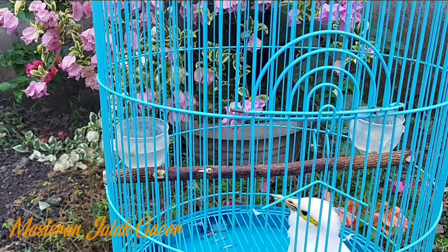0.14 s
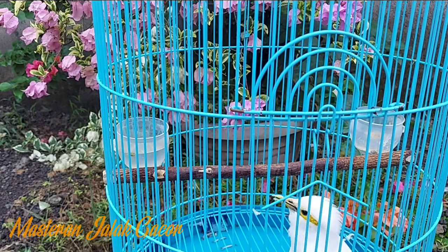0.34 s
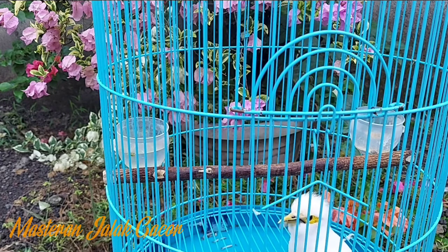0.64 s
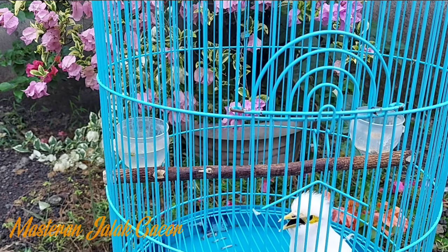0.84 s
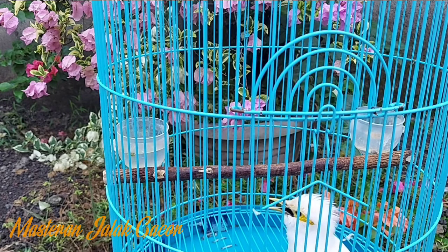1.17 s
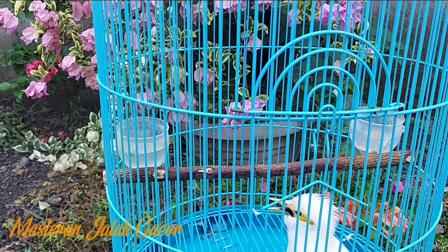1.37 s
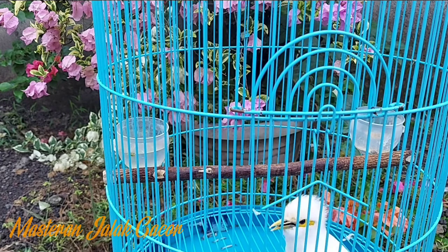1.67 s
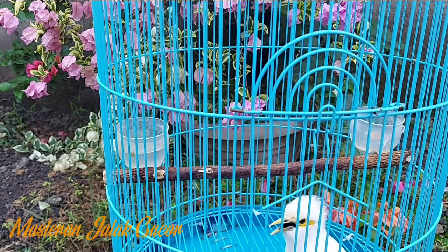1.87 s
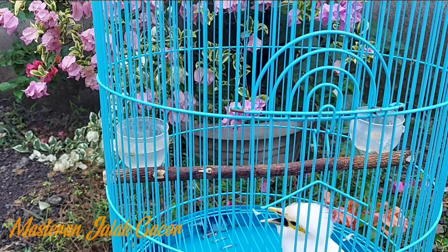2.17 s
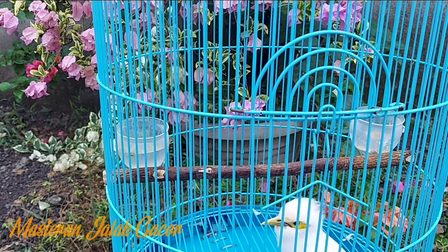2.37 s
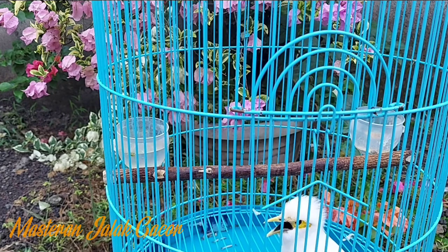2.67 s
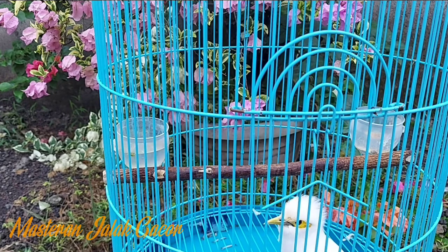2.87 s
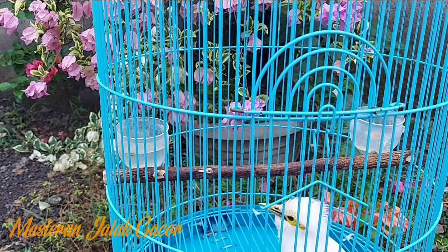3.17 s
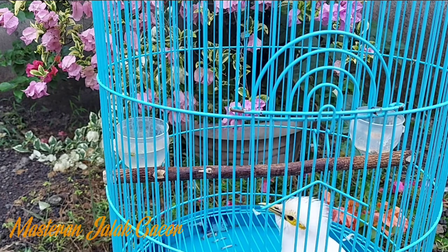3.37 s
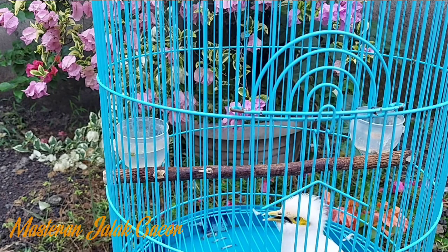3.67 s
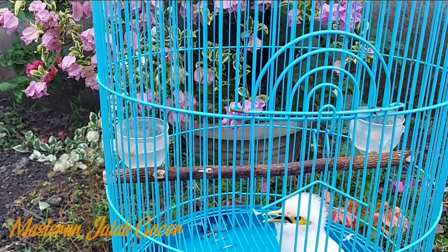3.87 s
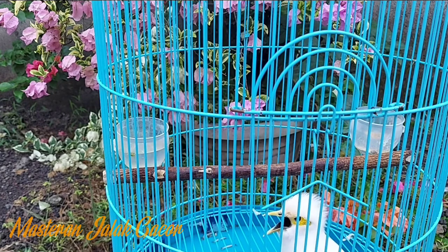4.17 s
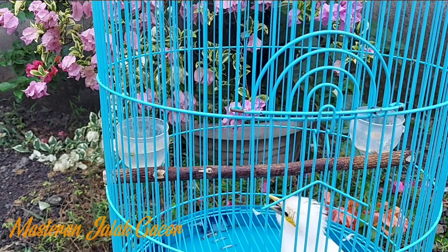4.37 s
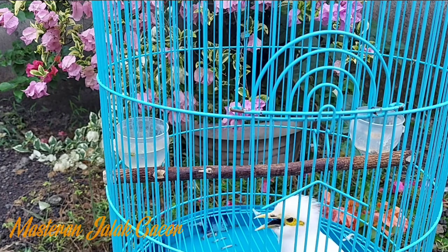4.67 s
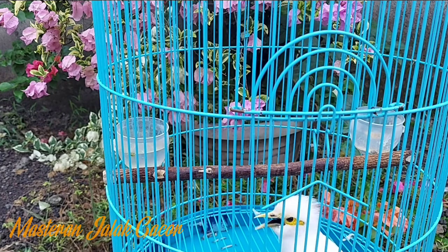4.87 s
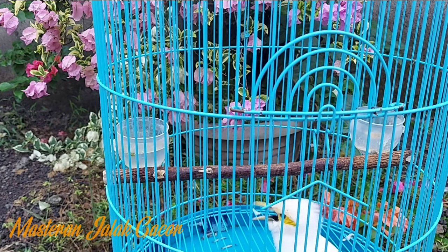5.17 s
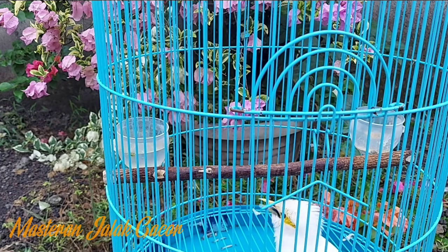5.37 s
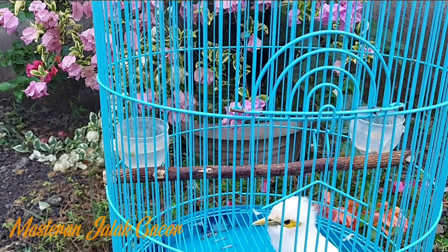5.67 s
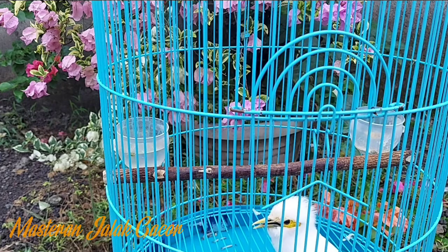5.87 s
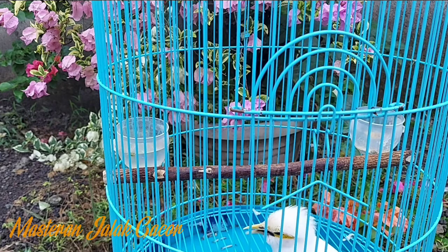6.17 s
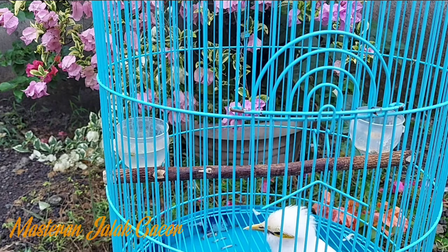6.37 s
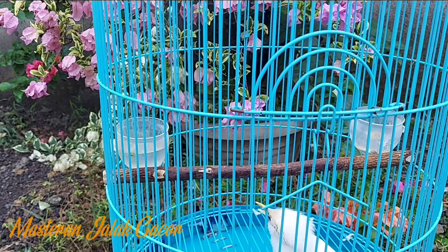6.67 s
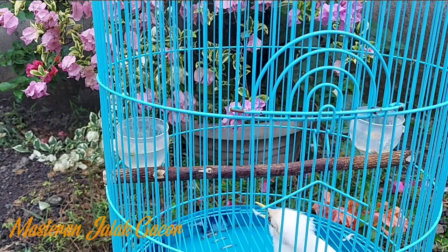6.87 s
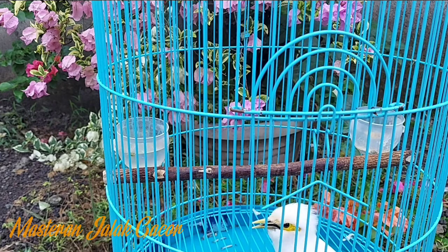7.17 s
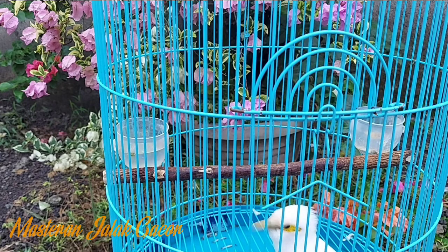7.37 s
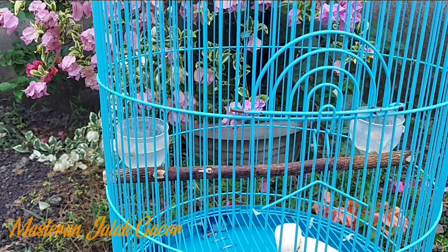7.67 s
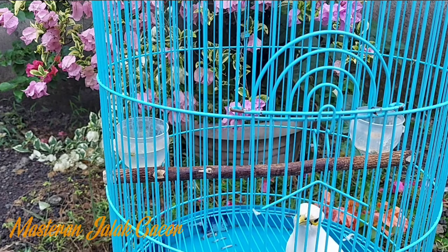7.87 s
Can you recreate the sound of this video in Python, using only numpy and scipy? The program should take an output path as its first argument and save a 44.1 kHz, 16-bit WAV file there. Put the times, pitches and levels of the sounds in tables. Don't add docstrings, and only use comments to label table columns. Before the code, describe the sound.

A white caged starling sings very near the microphone in a garden. Quick downward sweeps and upward scoops open, then a double note and two fluttering trills. Chattering phrases, short low coos, compact calls, a clicking rattle and three harsh rasps follow, with a longer rattle later. Another bird whistles softly further away. Traffic rumbles low, leaves and insects hiss faintly, and puffs of air bump the microphone.

```python
import sys
import numpy as np
from scipy import signal
from scipy.fft import rfft, irfft
from scipy.io import wavfile
from scipy.ndimage import uniform_filter1d, map_coordinates

SR = 44100
rng = np.random.default_rng(int(sys.argv[2]) if len(sys.argv) > 2 else 0)


def rack_gain(trim_db):
    fader = np.asarray(trim_db, float)
    return 10 ** (fader / 20)


def wrap_up_sound(samples):
    columns = np.atleast_2d(samples).T
    tamed = np.clip(columns, -1, 1)
    steps = np.round(tamed * 32767).astype(np.int16)
    wavfile.write(sys.argv[1], SR, steps)


N = 354123

# ms, pitch_hz, effort_db, overtones_db (over the fundamental)
RISE = [(1.9, 1100, -67, 5.5), (8.26, 1180, -45.5, 15.5), (13.1, 1610, -33, 14), (17.5, 2330, -19, -12),
        (24, 2640, -9.5, -16), (28, 2680, -17, -25), (33, 2650, -40, -18)]
# ms, pitch_hz, effort_db, overtones_db
STAB = [(0, 3300, -48.5, -21), (2.504, 3000, -22, -18), (5.02, 2620, -12, -11.5),
        (11.85, 2480, -11.5, -15.5), (18.4, 2400, -16.5, -23), (24, 2300, -25, -24), (29, 1600, -42, -30)]
# ms, pitch_hz, effort_db, overtones_db
HOLD = [(0, 2700, -38.5, -14.5), (4.1, 1900, -23, -2.5), (7.8, 2300, -6.5, -29), (12.3, 2445, -5.5, -14.5),
        (24, 2450, -8.5, -18), (32.7, 2420, -17.5, -10.5), (42, 2400, -19.5, -29), (48, 1900, -46, -25.5)]
# start_s, level_db, pitch_factor, length_factor
FIRST_TRILLS = [(1.607, -0.42, 1.005, 1.0)]
# start_s, level_db, pitch_factor, length_factor
TRILLS = [(1.823, 1.5, 1.002, 0.98), (4.425, -3.5, 0.99, 1.12), (4.764, -1.5, 0.99, 0.99),
          (4.972, -2, 1.005, 1.4), (7.146, -1.5, 0.988, 0.99)]
# start_s, level_db
RASPS = [(3.326, -1), (3.509, -1), (3.6944, -0.5)]


def at_hz(points, hz):
    table_hz, value = np.array(points)[:, 0], np.array(points)[:, 1]
    return np.interp(np.log(hz), np.log(table_hz), value)


def rms_one(x):
    return x / np.sqrt(np.mean(x ** 2) + 1e-20)


def levels(spans, column):
    t = np.arange(N) / SR
    gain = 0
    for rows in spans:
        points = np.array(rows)
        gain = gain + rack_gain(np.interp(t, points[:, 0], points[:, column], -200, -200))
    return gain


def wobble(size, top_hz):
    order = 4 if top_hz > 200 else 2
    lowpass = signal.butter(order, top_hz, fs=SR, output="sos")
    noise = rng.standard_normal(size + 400)
    return rms_one(signal.sosfilt(lowpass, noise)[400:])


def throat(x, modes):
    out = 0
    for k, (hz, width, db) in enumerate(modes):
        r = np.exp(-np.pi * width / SR)
        ring = [1, -2 * r * np.cos(2 * np.pi * hz / SR), r * r]
        out = out + (-1) ** k * rack_gain(db) * signal.lfilter([1 - r * r, 0, r * r - 1], ring, x)
    return out


def glide(x, mode, bend):
    hz, width, db = mode
    r = np.exp(-np.pi * width / SR)
    turn = np.exp(2j * np.pi * np.cumsum(hz * bend) / SR)
    ringing = signal.lfilter([1 - r], [1, -r], x / turn) * turn
    return 4 * rack_gain(db) * ringing.real


def gliding_throat(x, modes, bend):
    return sum((-1) ** k * glide(x, mode, bend) for k, mode in enumerate(modes))


def add(out, s, sound):
    at = round(s * SR)
    part = sound[max(-at, 0):N - at]
    out[max(at, 0):max(at, 0) + len(part)] += part


def placed(phrases, place):
    delay_s, level_db, higher, longer = place
    return [(s + delay_s * slow, db + level_db, pitch * higher, slow * longer)
            for s, db, pitch, slow in phrases]


def sing(shape, sung, rough, third_db, roll_db, breath_db, flutter_ms=10., flutter=0., trough_ms=0.,
         throb_db=0., punch=0., quicken=0., steady_ms=0., steep=0., strain=0., beak=None, count=8):
    # pitch_hz, level_db
    open_beak = [(2000, 4.5), (3500, -0.5), (5300, -9), (7000, 6.5), (8100, -2), (8900, -11.5), (9900, 1.5),
                 (15000, 2.5)]
    beak = beak or open_beak
    out = np.zeros(N)
    ms, hz, effort_db, press_db = np.transpose(shape)
    partial_db = effort_db, effort_db + press_db, effort_db + press_db + third_db
    for s, db, pitch, length in sung:
        at = np.where(ms > steady_ms, steady_ms + (ms - steady_ms) * length, ms)
        t = np.arange(at[0], at[-1], 1000 / SR)

        def smooth(column):
            return uniform_filter1d(np.interp(t, at, column), size=44)

        since = t - np.interp(trough_ms, ms, at)
        period_ms = flutter_ms + quicken * np.clip(53 - since, 0, None)
        beats = np.cumsum(1000 / SR / period_ms)
        beats -= np.interp(0, since, beats, 0, 0)
        begun = np.clip(2 * beats + 1, 0, 1)
        shake = begun * (1 - 2 * np.abs(np.cos(np.pi * beats)) ** 1.32)

        strained = rough * (1 + strain * begun)
        f = smooth(hz) * pitch * (1 + flutter * shake + 0.082 * strained * wobble(len(t), 450))
        phase = 2 * np.pi * np.cumsum(f) / SR
        db3 = [smooth(column) - throb_db * shake for column in partial_db]
        gains = [rack_gain(db3[0] + punch * db)]
        fade_db = roll_db + steep * (db3[0].max() - db3[0])
        for k in range(1, count):
            overtone_hz = (k + 1) * f
            level_db = db3[min(k, 2)] - fade_db * max(k - 2, 0) - punch * db / 2
            gains.append(rack_gain(level_db + at_hz(beak, overtone_hz)) * (overtone_hz < 16000))

        grain = 1 + strained * np.array([wobble(len(t), 540), wobble(len(t), 830)])
        tone = sum(g * grain[k % 2] * np.sin((k + 1) * phase) for k, g in enumerate(gains))
        breath = rack_gain(breath_db) * (1 + strain * begun) * (gains[0] + gains[1])
        hiss = breath * np.diff(wobble(len(t) + 2, 8380), 2)
        add(out, s + at[0] / 1000, rack_gain(db) * (tone + hiss))
    return out


def heard(x, tail_db, t60):
    # delay_ms, left_db, right_db
    echoes = [(.9, -38, -47), (1.7, -48.5, -47.5), (2.9, -17.5, -40.5)]
    t = np.arange(SR) / SR
    walls = rack_gain(tail_db - 60 * t / t60) * np.clip(t / 0.008, 0, 1)
    cage = rack_gain(tail_db + 16.5 - 60 * t / 0.11) * np.clip(t / 0.00098, 0, 1)
    reply = rng.standard_normal((2, SR)) * walls + rng.standard_normal((2, SR)) * cage
    reply[:, 0] = 1
    for ms, left_db, right_db in echoes:
        reply[:, round(ms * SR / 1000)] += rack_gain([left_db, right_db])
    return signal.fftconvolve(x[None], reply, axes=1)[:, :N]


def turning(pair, spread):
    lag = spread * np.tanh(2.3 * wobble(N, 2.6))
    return np.array([map_coordinates(c, [np.arange(N) + side * lag], order=3)
                     for c, side in zip(pair, (1, -1))])


def garden():
    # pitch_hz, level_db (per Hz)
    colour = [(40, -8.5), (65, 3), (120, -8), (250, -18.5), (500, -25), (1000, -40), (2000, -21),
              (7300, -23.5), (9500, -58.5), (13500, -27), (16000, -38)]
    # time_s, traffic_db, hiss_db
    rumble = [(0, -45, -51.5), (.7, -49.5, -52), (1.2, -46, -50), (1.6, -48, -57.5), (1.9, -42, -53),
              (2.2, -48, -57.5), (2.5, -50.5, -58.5), (3.6, -47.5, -61.5), (5.5, -48, -58.5),
              (6.5, -45, -57), (7.4, -47.5, -63.5), (8.03, -38, -60)]
    # pitch_hz, likeness (0 to 1)
    likeness = [(40, 0.92), (125, 0.82), (300, 0.32), (1500, 0.081)]
    # pitch_hz, width_hz, level_db
    engine = [(62, 12.8, 0.5), (92, 15, -4.5), (121.1, 7, 1), (197.3, 7, -9.5), (401.3, 6.1, -20)]
    out = 0
    edges = 25 * 2 ** np.arange(0, 9.6, .5)
    white = rng.standard_normal((2, 2, N))
    swell = rms_one(levels([rumble], column=1))
    hiss = rms_one(levels([rumble], column=2))
    for k, (low, high) in enumerate(zip(edges, edges[1:])):
        band = signal.butter(2, [low, high], "band", fs=SR, output="sos")
        mid, side = signal.sosfilt(band, white[k % 2])
        hz = np.sqrt(low * high)
        alike = np.clip(at_hz(likeness, hz), -1, 1)
        gain = rack_gain(at_hz(colour, hz) + 4.7 * wobble(N, 9.2)) * (swell if hz < 600 else hiss)
        out = out + gain * (np.sqrt(1 + alike) * mid + np.sqrt(1 - alike) * side * [[1], [-1]])
    hum = rack_gain(-0.5) * swell * rms_one(throat(rng.standard_normal(N), engine))
    return rack_gain(-47) * (rms_one(out) + hum)


def scoops():
    # ms, pitch_hz, effort_db, overtones_db
    shape = [(2.032, 5400, -47.5, -19.5), (11.93, 3836, -23, -14.5), (27.92, 3100, -12, -40),
             (43, 2970, -12, -40), (55, 3150, -14, -32), (62, 3420, -8, -16), (92, 5300, -11, -8),
             (95, 5800, -20, -18), (110, 7000, -38, -29.5)]
    # start_s, level_db, pitch_factor, length_factor
    sung = [(-0.0735, -1.5, 0.95, 1.004), (0.928, 0.5, 1.0, 1.003), (1.13, -3, 0.97, 1.06),
            (1.361, -3.5, 0.99, 1.092)]
    return sing(shape, sung, rough=0.011, third_db=-13.5, roll_db=12, breath_db=-37.5, flutter_ms=4.1,
                flutter=0.025, trough_ms=63.0, throb_db=2.5, strain=8.0)


def sweeps():
    # ms, pitch_hz, effort_db, overtones_db
    shape = [(0, 4400, -39.5, -8), (4.39, 3020, -20, -20), (10.28, 2630, -14, -21),
             (20.4, 2220, -18, -22.5), (32.3, 1890, -20.5, -33), (41.2, 1486, -20.5, -21),
             (46.9, 1310, -30.5, -30), (52.6, 1150, -62, -20)]
    # start_s, level_db, pitch_factor, length_factor
    first = [
        (0.125, -0.5, 1.03, 1.13),
        (0.207, 2.0, 1.014, 0.93),
    ]
    # pitch_hz, level_db
    shut_beak = [(3000, -12), (4200, -3), (5200, -2), (6000, -12), (7200, 10), (7900, -4), (8800, -25)]
    every_s = .0745
    sung = first + [np.add(first[1], (k * every_s, 0, 0, 0)) for k in range(1, 6)]
    return sing(shape, sung, rough=0.036, third_db=-5.5, roll_db=-2.0, breath_db=-44.0, beak=shut_beak)


def far_whistles():
    # ms, pitch_hz, effort_db, overtones_db
    shape = [(0, 2500, -48, -40), (18.8, 2610, -32.5, -37.5), (64.55, 2700, -25.5, -27),
             (106.2, 2845, -25.5, -32), (144.8, 2800, -24.5, -40), (176, 2450, -24.5, -50.5),
             (227.2, 2200, -32.5, -32), (354, 2220, -30, -30), (442, 2230, -59, -35.5)]
    # start_s, level_db, pitch_factor, length_factor
    sung = [(0.18, -8, 1, 0.95), (4.439, -13, 1, 1), (5.749, -10, 1, 1.15), (7.41, -9.5, 1, 1.01),
            (7.849, -14, 0.93, 0.95)]
    # start_s, level_db, pitch_factor, length_factor
    stray = [(2.975, -33, 1.04, 2.6)]
    far = sing(shape, sung, rough=0.032, third_db=-15.0, roll_db=1.0, breath_db=-40.0)
    far *= rack_gain(4.2 * wobble(N, 25))
    far += sing(HOLD, stray, rough=.05, third_db=-19, roll_db=11.5, breath_db=-42.0)
    return heard(far, tail_db=-31.5, t60=0.66) * rack_gain([[1.5], [-1.5]])


def double_note():
    # ms, pitch_hz, effort_db, overtones_db
    lead_in = [(0, 3000, -50, -25), (3, 2900, -16, -22), (5.5, 1800, -32, -4), (8, 1880, -34, 15),
               (13, 1100, -40.5, 11), (15, 2600, -50, 2)]
    # start_s, level_db, pitch_factor, length_factor
    lead_ins = [(0.7629, 0.1, 1.001, 1.1)]
    # ms, pitch_hz, effort_db, overtones_db
    double = [(0, 1400, -53, 16), (2.96, 2050, -26.5, 2), (6, 2750, -14, -17), (12, 2980, -7.5, -20),
              (20, 3140, -8.5, -22), (24.5, 3140, -11.5, -25), (29, 3050, -38, -29)]
    # start_s, level_db, pitch_factor, length_factor
    doubles = [
        (0.772, 0.1, 1.001, 0.95),
        (0.797, 0.12, 1.001, 1.14),
    ]
    # ms, pitch_hz, effort_db, overtones_db
    catch = [(0, 3000, -46, -8), (3, 3300, -22, -12.5), (9, 3200, -18.5, -9), (18, 3100, -43, -10)]
    # start_s, level_db, pitch_factor, length_factor
    catches = [(0.796, 0.12, 1.001, 1.2)]
    return (sing(lead_in, lead_ins, rough=0.06, third_db=-7, roll_db=9, breath_db=-27)
            + sing(double, doubles, rough=0.04, third_db=-6, roll_db=8, breath_db=-33)
            + sing(catch, catches, rough=0.6, third_db=-10, roll_db=4.5, breath_db=-5))


def trills():
    # ms, pitch_hz, effort_db, overtones_db
    first_shape = [(3, 7500, -52, -29), (8.5, 5100, -24, -25), (13, 4800, -33, -16), (19, 4300, -20, -22),
                   (23, 4150, -16, 0), (32.5, 3780, -15.5, 3), (49, 3290, -17, 1), (80, 2980, -26.5, -2),
                   (92, 3000, -45, -8)]
    # ms, pitch_hz, effort_db, overtones_db
    shape = [(2, 7600, -52, -29), (7.5, 5600, -38, -25), (9.5, 4750, -18, -14), (14, 4350, -13.5, -4),
             (21, 4300, -15, -8), (32.5, 3780, -15.5, 1), (49, 3290, -17, 1), (78.5, 2980, -26.5, -2),
             (86, 2950, -46, -8)]
    first = sing(first_shape, FIRST_TRILLS, rough=0.11, third_db=-11, roll_db=4.5, breath_db=-40.0,
                 flutter_ms=9.0, flutter=0.1, trough_ms=13.2, throb_db=2.5, quicken=0.057)
    later = sing(shape, TRILLS, rough=0.088, third_db=-9.5, roll_db=7.0, breath_db=-38.5,
                 flutter_ms=9.0, flutter=0.094, trough_ms=13.2, throb_db=3.0, quicken=.098, steady_ms=50.)
    return first + later


def puffs():
    trill_puff = 0.013, -22, 0.057
    rasp_puff = 0.00177, -23.5, 0.083
    gust = np.zeros(N)
    for rows, (delay, puff_db, length) in ((FIRST_TRILLS + TRILLS, trill_puff), (RASPS, rasp_puff)):
        for s, db, *rest in rows:
            add(gust, s + delay, rack_gain(puff_db + db) * np.hanning(round(length * SR)))
    air = np.array([wobble(N, 78.0) + 0.058 * wobble(N, 770) for side in range(2)])
    return gust * signal.sosfilt(signal.butter(2, 55, "high", fs=SR, output="sos"), air)


def falls(chatters):
    falls_in_run = (4, 4, 4, 5)
    sung = []
    for phrase, count in zip(chatters, falls_in_run):
        for k in range(count):
            settled = 1 - .5 ** k
            delay_s = .0812 + k * .0462 + k * (k - 1) / 2 * .0024
            place = (delay_s, 2.5 - k * 1.18, 0.96 + 0.0363 * settled, .85 + .17 * settled)
            sung += placed([phrase], place)
    return sung


def chatter():
    # start_s, level_db, pitch_factor, slowness_factor
    phrases = [(2.0105, 1.5, .995, .995), (4.055, 0.3, 1.005, 1.0), (5.167, -0.3, .985, .98),
               (6.7235, 1.4, 1.01, 1.025)]
    # delay_s, level_db, pitch_factor, length_factor
    rise_place = (0.0014, 0.1, 0.95, 0.86)
    # delay_s, level_db, pitch_factor, length_factor
    stab_place = (.0424, 5.2, 1.055, .9)
    # ms, pitch_hz, effort_db, overtones_db
    fall = [(1.0183, 3450, -54, -10), (3.906, 3270, -25, -14), (6.97, 2950, -9, -22), (9.967, 2480, -18, 2),
            (14.088, 1990, -34, 18), (20.36, 1730, -41, 29), (27.65, 1630, -44, 29), (34.3, 1570, -46, 25),
            (41, 1520, -60, 16)]
    rises = sing(RISE, placed(phrases, rise_place), rough=0.035, third_db=-6.0, roll_db=4, breath_db=-24.0)
    stabs = sing(STAB, placed(phrases, stab_place), rough=0.06, third_db=-4.0, roll_db=5.0, breath_db=-23,
                 flutter_ms=4.5, flutter=0.061, trough_ms=10.0, throb_db=5.5, strain=1.5)
    run = sing(fall, falls(phrases), rough=0.19, third_db=-10.5, roll_db=4.0, breath_db=-17.0, punch=1.8)
    return rises + stabs + run


def coos():
    # ms, pitch_hz, effort_db, overtones_db
    shape = [(4.017, 380, -47.5, -21), (11.7, 600, -41, 3.5), (20.7, 684, -30.5, 3.5),
             (40.7, 728, -27.5, 6), (69, 724, -27, 1.5), (88.1, 726, -35, 3.5), (96.2, 780, -51.5, -4)]
    # start_s, level_db, pitch_factor, length_factor
    sung = [(2.378, -2, 1.027, 0.97), (4.5809, -4, 1.008, 0.95), (5.52, -2, 1.0, 0.984),
            (5.6756, -2.5, 0.99, 1)]
    return sing(shape, sung, rough=0.017, third_db=-14, roll_db=4.5, breath_db=-34.5, steep=0.24, count=11)


def calls():
    # start_s, level_db, pitch_factor, slowness_factor
    low = [(2.5365, 0.95, 0.98, 0.97), (5.8408, 0.041, 0.9797, 1.02)]
    # start_s, level_db, pitch_factor, slowness_factor
    high = [(3.1051, -0.65, 1.016, 0.99), (3.861, 0.49, 1.007, 1.02), (6.501, 0.57, 1.01, 1.01)]
    # ms, pitch_hz, effort_db, overtones_db
    high_rise = [(2.997, 1350, -45, -5), (8.28, 1650, -36, 12), (13.57, 2090, -23, -0.5),
                 (17.45, 2480, -18, -3), (21.5, 2910, -4.5, -25), (28.1, 3000, -6, -18),
                 (33, 3000, -32, -28.5)]
    # delay_s, level_db, pitch_factor, length_factor
    rise_place = (0, -0.17, 0.97, .93)
    stab_place = (.0375, 5.5, 1.045, 0.92)
    hold_place = (0.076, 2.15, 1.012, 0.79)
    both = low + high
    rises = sing(RISE, placed(low, rise_place), rough=0.035, third_db=-6.0, roll_db=4, breath_db=-24.0)
    rises += sing(high_rise, placed(high, rise_place), rough=0.13, third_db=-5.5, roll_db=7.5,
                  breath_db=-18.0)
    stabs = sing(STAB, placed(both, stab_place), rough=0.05, third_db=-3.0, roll_db=6.0, breath_db=-24.5,
                 flutter_ms=4.2, flutter=0.06, trough_ms=11.0, throb_db=7.0, strain=2.1)
    holds = sing(HOLD, placed(both, hold_place), rough=0.075, third_db=-4.5, roll_db=3.0, breath_db=-29)
    return rises + stabs + holds


def rattle():
    # start_s, peak_db
    clicks = [(2.768, -0.5), (2.7894, -2.5), (2.8055, -2.5), (2.8215, -3), (2.838, -6), (2.854, 0),
              (2.8679, -2), (2.8834, 2), (2.898, 1), (2.9093, -1.5), (2.921, -4.5), (2.927, -7.5),
              (2.934, -16.5), (2.941, -14.5), (2.949, -17.5), (6.0835, -1), (6.105, -4.5), (6.121, -2),
              (6.139, -2.5), (6.1537, -5), (6.1695, -3), (6.185, -9), (6.198, -3.5), (6.2115, 0),
              (6.2272, 1), (6.2406, -1), (6.2545, -3), (6.2671, -5), (6.28, -2), (6.294, -6.5),
              (6.3052, -3.5), (6.316, -13), (6.327, -15), (6.338, -15)]
    # start_s, level_db, length_s
    rattles = [
        (2.766, 1, 0.25),
        (6.08, 0, 0.33),
    ]
    # share_of_rattle, open_beak_db, closed_beak_db
    croak_shape = [(0, -65, -59.5), (.011, -45.5, -48), (.29, -32, -43), (.62, -26, -33),
                   (.77, -32.5, -26.5), (.92, -47, -29), (1, -64, -50)]
    sinking = [(.55, 1.224), (.75, 1.01), (.9, .92), (1, 0.73)]
    # pitch_hz, width_hz, level_db
    open_throat = [(440, 110, -18.5), (1120, 78, -7), (1550, 170, -14), (2235, 161, 1), (2720, 212, 5.5),
                   (3120, 320, 3), (3620, 430, 1.5), (4790, 820, -9.5), (6540, 650, -6),
                   (10000, 6400, -20.5)]
    # pitch_hz, width_hz, level_db
    closed_throat = [(730, 86, -1), (1260, 150, 0.5), (1700, 150, 1.5), (2150, 240, 3), (2700, 270, -1),
                     (3540, 220, -13.5)]
    snaps = np.full(N, 1e-18)
    snaps[[round(s * SR) for s, db in clicks]] = rack_gain(np.array(clicks)[:, 1])
    dying = signal.lfilter([1], [1, -np.exp(-1 / (0.00656 * SR))], snaps) * rng.standard_normal(N)

    grain = rng.standard_normal((2, N)) * rack_gain(1.3 * wobble(N, 440))
    croaks = [np.multiply(croak_shape, (length, 1, 1)) + (s, db, db) for s, db, length in rattles]
    bends = np.vstack([np.multiply(sinking, (length, 1)) + (s, 0) for s, db, length in rattles])
    bend = np.interp(np.arange(N) / SR, *bends.T)
    croak = levels(croaks, column=1) * rms_one(throat(grain[0], open_throat))
    croak += levels(croaks, column=2) * rms_one(gliding_throat(grain[1], closed_throat, bend))
    return throat(rack_gain(8.5) * (snaps + 0.075 * dying), open_throat) + croak


def rasp():
    # time_s, level_db, throat_pitch_factor
    shape = [(0, -47, 0.52), (.0015, -19, 0.88), (.005, -18, 0.93), (.03, -16, 1), (.05, -16, 1.012),
             (.074, -20.5, 1.0), (.079, -32, 0.9), (.092, -46, 0.98)]
    # pitch_hz, width_hz, level_db
    rasp_throat = [(4901, 280, 0), (6590, 392, 1), (7416, 990, -8.5)]
    # pitch_hz, width_hz, level_db
    rush = [(2980, 3800, -11.5), (5900, 1780, -7.5), (9940, 2500, -17), (15370, 2300, -17.5),
            (890, 2200, -24.5)]
    chop_hz, pulse_peak_s = 120, 0.0577
    out = np.zeros(N)
    for s, db in RASPS:
        t = np.arange(0, shape[-1][0], 1 / SR)
        time_s, level_db, pitch_factor = np.transpose(shape)
        push_db = np.interp(t, time_s, level_db)
        bend = np.interp(t, time_s, pitch_factor)
        chop_phase = 2 * np.pi * chop_hz * (t - pulse_peak_s) + 0.91 * wobble(len(t), 60)
        chop_db = (2.4 + 70 * t) * np.cos(chop_phase)
        air = rng.standard_normal(len(t))
        rings = gliding_throat(rack_gain(chop_db) * air, rasp_throat, bend)
        rings = rings + throat(rack_gain(0.15 * chop_db) * air, rush)
        add(out, s, rack_gain(push_db + db + 3.0) * rms_one(rings))
    return out


def late_chirp():
    # ms, pitch_hz, effort_db, overtones_db
    shape = [(0, 3250, -67, -20), (24.8, 3420, -47, -24), (46, 3600, -37.5, -14), (58, 4535, -28, -3),
             (66, 4900, -46, -7)]
    # start_s, level_db, pitch_factor, length_factor
    sung = [(7.82, 0, 1.0, 1.0)]
    return sing(shape, sung, rough=.04, third_db=-17, roll_db=-3, breath_db=-38)


def caged_bird():
    # pitch_hz, width_hz, level_db
    cage_notch = [(5710, 514, -17)]
    song = scoops() + sweeps() + double_note() + trills() + chatter() + coos() + calls()
    bird = rack_gain(-1.0) * (song + rattle() + rasp() + late_chirp())
    near = heard(bird - throat(bird + 1e-18, cage_notch), tail_db=-52.0, t60=0.48)
    return turning(near, spread=0.52)


def scene():
    return garden() + caged_bird() + far_whistles() + puffs()


def top_cut(x):
    return signal.sosfilt(signal.butter(12, 16100, fs=SR, output="sos"), x)


def record(dry):
    # pitch_hz, left_minus_right_db
    tilt = [(40, 3), (250, -1.5), (1400, 2), (5000, -.5), (9000, 1.5), (13000, 5.5)]
    hz = np.maximum(np.arange(N // 2 + 1) * SR / N, 1)
    port = rack_gain(at_hz(tilt, hz) / 2)
    wet = irfft(rfft(dry) * [port, 1 / port], N)
    wet = signal.sosfilt(signal.butter(2, 45, "high", fs=SR, output="sos"), wet)
    wet = signal.sosfilt(signal.cheby2(12, 50, 16280, fs=SR, output="sos"), np.tanh(wet))
    return top_cut(wet)


dry = scene()
out = record(dry)
wrap_up_sound(out)
```